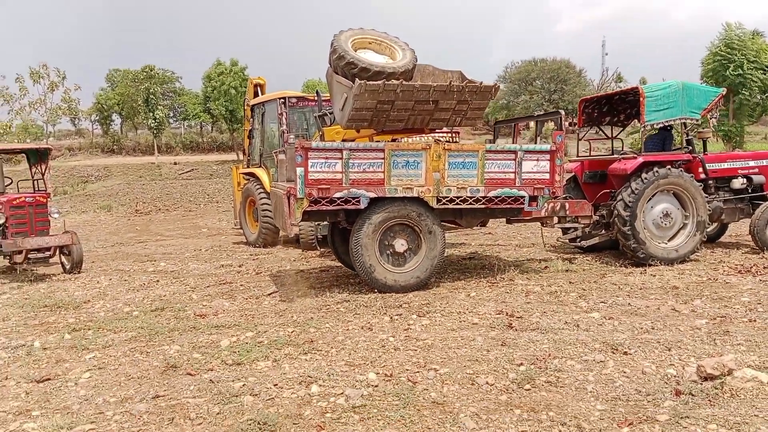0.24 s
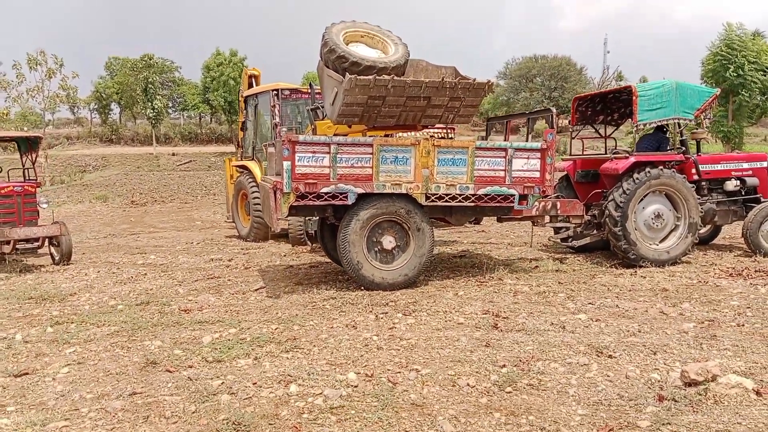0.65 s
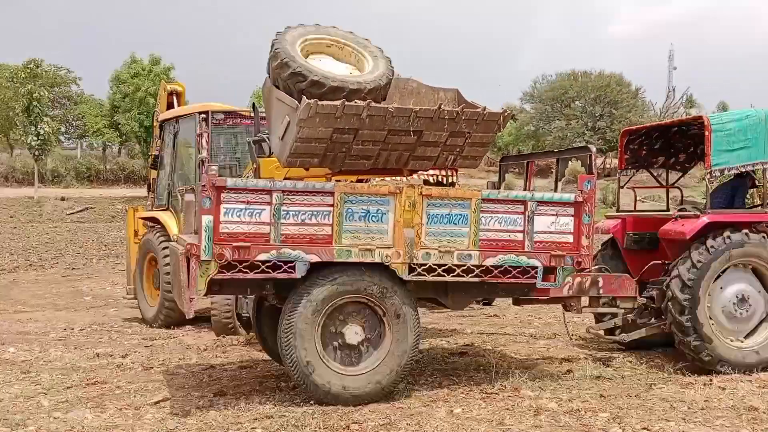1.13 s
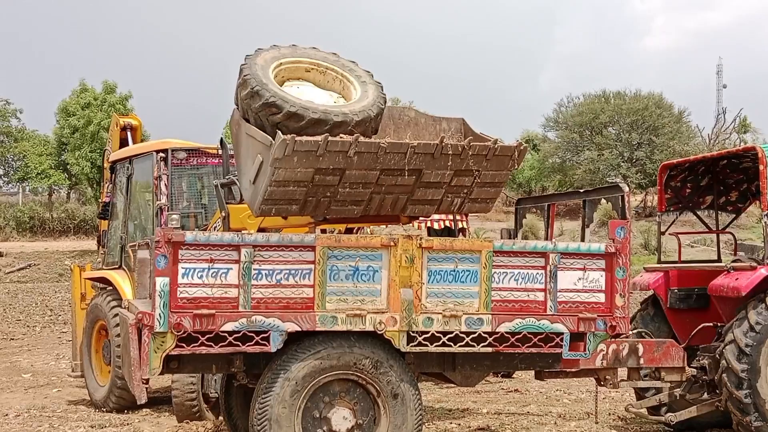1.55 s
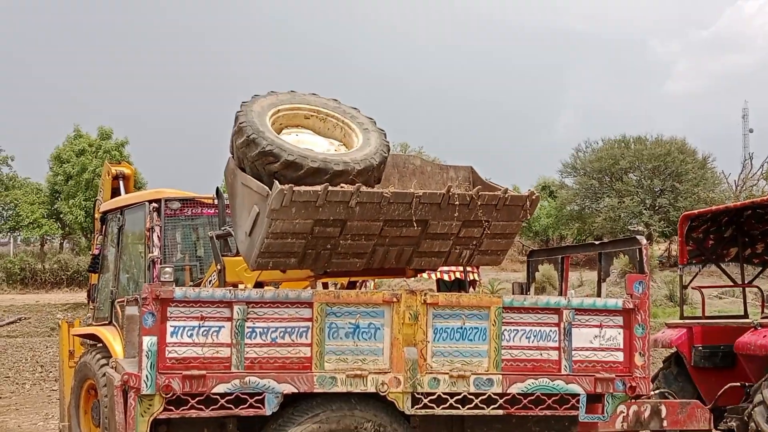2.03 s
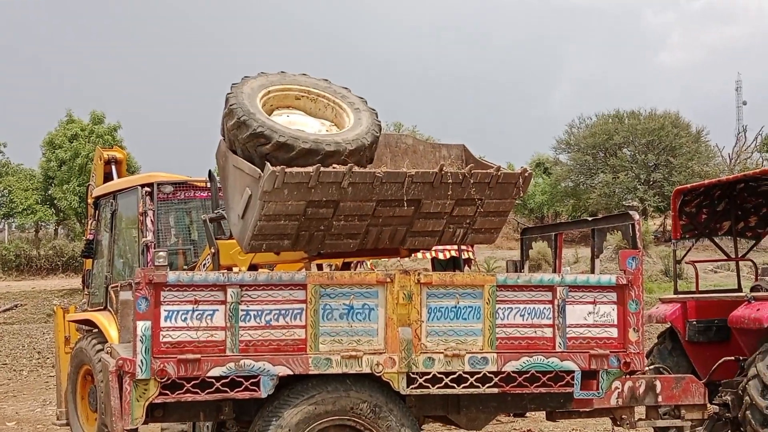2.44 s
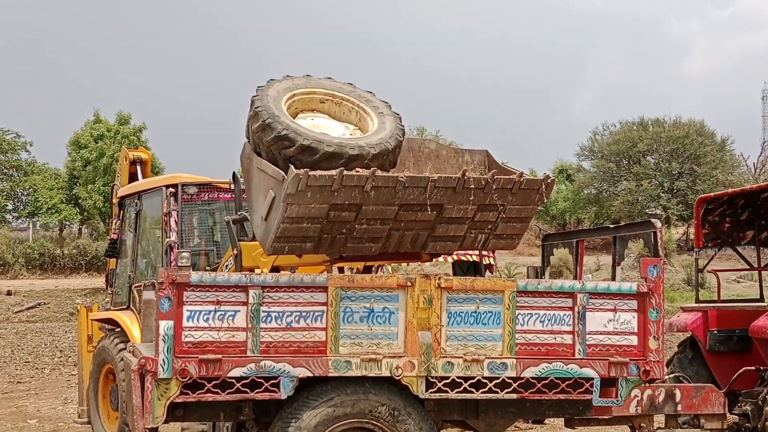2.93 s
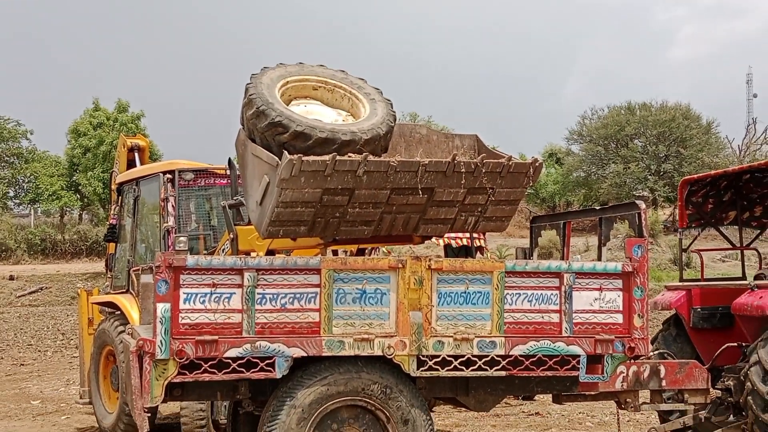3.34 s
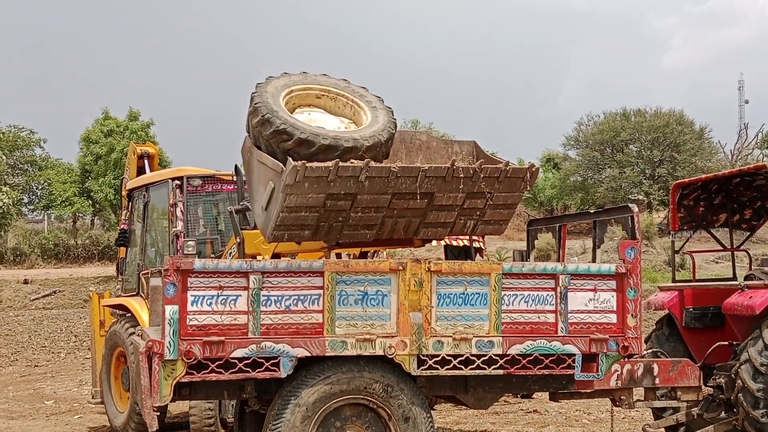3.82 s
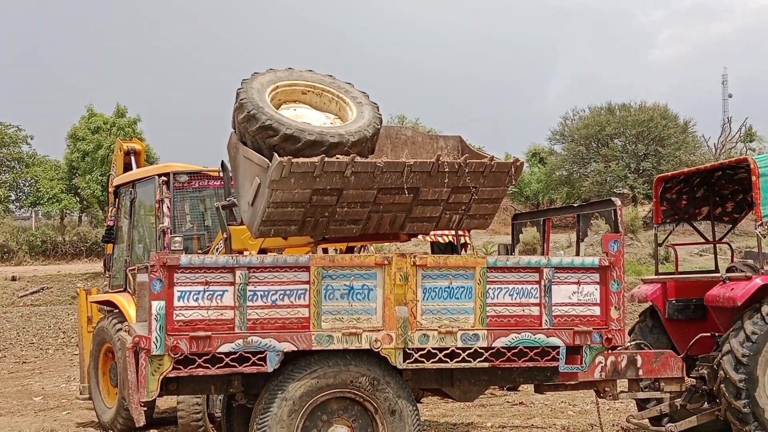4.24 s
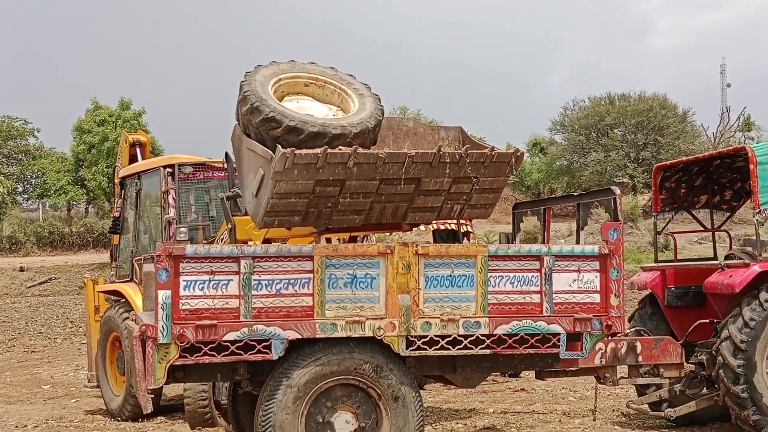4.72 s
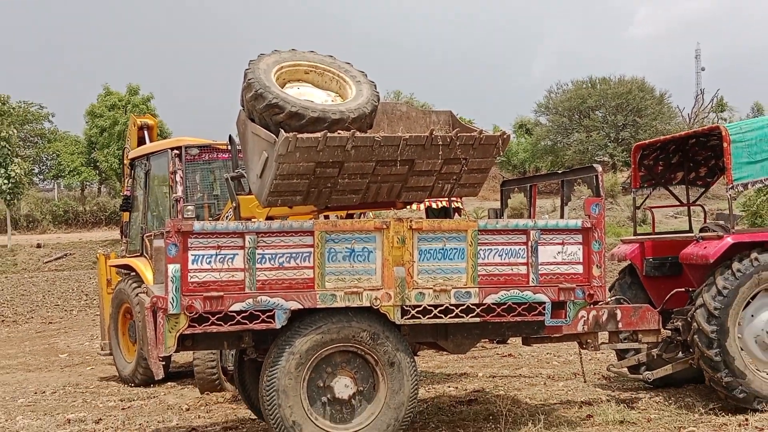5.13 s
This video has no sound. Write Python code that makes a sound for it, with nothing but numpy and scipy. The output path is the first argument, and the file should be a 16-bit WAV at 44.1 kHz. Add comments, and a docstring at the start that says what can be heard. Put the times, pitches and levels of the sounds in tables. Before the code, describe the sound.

Steady low diesel idling outdoors, with crunching dry clods, gritty scuffs, a brief squeak, scattered steel knocks and light wind bumps on the microphone.

```python
"""A diesel engine idles across a dry field: harmonics of its cycle form a deep exhaust hum, and noise
pulsed by each firing excites the panels of the block into a dull clatter, with buzzes and a far hiss.
Close by, feet scuff over grit (patchy, grainy noise) and crunch dry clods (short noise bursts);
a few knocks ring decaying steel modes, a pin ticks, a joint squeaks on a gliding tone,
and light wind rumbles on the microphone as low noise with puffs."""
import sys
import numpy as np
from scipy import signal
from scipy.fft import rfft, irfft
from scipy.io import wavfile
from scipy.ndimage import uniform_filter1d

SR = 44100
rng = np.random.default_rng(int(sys.argv[2]) if len(sys.argv) > 2 else 0)


def store_pcm(level_fs):
    """Save levels as 16-bit WAV."""
    pcm = np.round(np.clip(level_fs, -1, 1) * 32767).astype(np.int16)
    wavfile.write(sys.argv[1], SR, np.atleast_2d(pcm).T)


def elevation(decibels):
    """Turn decibel levels (scalar or array-like) into linear amplitude ratios."""
    levels = np.asarray(decibels, float)
    return 10 ** (levels / 20)


N = 237390
T = np.arange(N) / SR
TOP_ORDER = 6  # the strongest exhaust line, as a multiple of the engine cycle

# Engine speed. Each row: time in seconds, pitch of the strongest exhaust line in Hz.
ENGINE_SPEED = [(0, 92.69), (.25, 92.1), (1.5, 91.92), (1.62, 93.01), (4.9, 93.82), (5.0, 96.4),
                (5.2, 95.9), (5.3, 92.2), (5.38, 91)]
# Strongest exhaust line. Each row: time in seconds, level in dB.
HUM_LEVEL = [(0.0, -46), (0.04, -41), (0.78, -41), (0.82, -36), (1.0, -44), (1.08, -39), (1.38, -39.5),
             (1.53, -46), (1.6, -39), (1.66, -43.5), (2.13, -41.5), (2.2, -44.5), (2.31, -42),
             (2.85, -39.5), (2.91, -45), (3.15, -39), (4.08, -41), (4.22, -46), (4.3, -39), (4.38, -45.5),
             (4.6, -40), (4.76, -51), (4.92, -45), (4.97, -39.5), (5.21, -39.5), (5.26, -54), (5.33, -45.5),
             (5.38, -51)]
# Weaker exhaust lines. Each row: multiple of the engine cycle, level in dB over the strongest line,
# waver in dB (its sign only flips the random swing).
EXHAUST_LINES = [(.5, -23.5, -1.5), (1, -33, 7), (1.5, -36, 4), (2, -32, 6), (2.5, -30, 2.5), (3, -25, 3.),
                 (5, -26.5, 2), (7, -15.5, 0.5), (8, -32, 0), (9, -28, -0.5), (10, -37.5, -4.5),
                 (12, -40.5, 7.5)]
# Clatter of the block. Each row: time in seconds, level in dB.
CLATTER_LEVEL = [(0.0, -44), (0.09, -46), (0.6, -49), (0.78, -46), (0.94, -49.5), (1.03, -46), (1.3, -49),
                 (1.66, -53), (2.1, -53), (2.37, -53.5), (2.71, -55.5), (3.09, -56), (3.48, -53),
                 (3.82, -55.5), (4.18, -55.5), (4.34, -57), (4.97, -56.5), (5.14, -54), (5.38, -55)]
# Colour of the clatter. Each row: time in seconds, brightness in dB per octave above 1.2 kHz,
# treble lift in dB above 2.7 kHz.
CLATTER_TONE = [(0, 2, -6), (.8, -3.5, 0), (1.0, 12.5, -5.5), (1.6, 2, -3.5), (2.4, 10.5, -10),
                (3.1, 5.5, -3.5), (3.5, -3.5, 8), (5.38, -4.5, 11.5)]
# Spectrum of the block. Each row: frequency in Hz, relative density in dB per Hz.
BLOCK_SPECTRUM = [(120, -41), (200, -18), (267, -22.5), (508, -17.5), (651, -24.5), (881, -6),
                  (1240, -11.5), (1490, -7.5), (2120, -18), (2450, -18), (4600, -45), (5980, -88.5),
                  (10100, -120)]
# Ringing panels. Each row: frequency in Hz, width in Hz, mean level in dB over the block.
PANEL_MODES = [(360, 48, 7), (374, 6.7, 7), (891, 88, 14.5), (1089, 51, 6), (1252, 41, 7), (1428, 50, 11),
               (1672, 80, 9.5), (1767, 21, 4.5), (2600, 21, -2.5), (3477, 44, 10.5), (3900, 71, 9)]
# Buzzing panels. Each row: frequency in Hz, width of one filter pass in Hz.
BUZZ_PANELS = [(507, 26), (2440, 140)]
# Bouts of buzzing. Each row: time of the peak in seconds, panel frequency in Hz, peak level in dB,
# length in seconds.
BUZZ_BOUTS = [(0.015, 2440, -61, 0.079), (0.489, 507, -55.5, 0.063), (.57, 2440, -60.5, 0.11),
              (0.62, 507, -69, 0.032), (0.826, 2440, -52, 0.061), (0.883, 507, -65, 0.064),
              (1.151, 507, -52, 0.046), (1.2, 2440, -55.5, 0.28), (1.271, 507, -51, 0.04),
              (1.564, 2440, -64.5, 0.44), (1.594, 507, -55, .15), (2.013, 2440, -68, 0.17),
              (2.23, 507, -61.5, 0.041), (2.407, 2440, -52.5, 0.13), (2.723, 2440, -56, 0.2),
              (2.726, 507, -46.5, 0.075), (2.857, 507, -60, 0.049), (2.907, 2440, -61, 0.11),
              (3.157, 2440, -60, 0.036), (3.372, 507, -60.5, 0.051), (4.292, 2440, -67, 0.054),
              (4.642, 507, -63, 0.057), (5.12, 507, -66.5, 0.12)]
# Spectrum of the far hiss. Each row: frequency in Hz, relative density in dB per Hz.
AIR_SPECTRUM = [(2710, -41), (4600, -1), (5390, -4), (5660, -7), (6130, -11), (6560, -13.5), (7620, -6),
                (9470, -13.5), (10300, -8.5), (11600, -17), (12700, -11.5), (14900, -11.5), (16400, -21.5)]
# Loose metal shimmering in a hiss. Each row: frequency in Hz, width in Hz, nominal dB over the hiss.
SHIMMER_MODES = [(6044, 26, 12), (6670, 280, 15), (7300, 190, 7), (7800, 180, 7.5), (9000, 120, 4.5),
                 (8100, 150, 14), (10330, 350, 4), (12300, 200, 0), (12500, 850, 4.5)]
# Spectrum of the wind. Each row: frequency in Hz, relative density in dB per Hz.
WIND_SPECTRUM = [(12, -24), (28, -16.5), (45, -18.5), (110, 7), (170, 2.5), (260, -10), (450, -15.5),
                 (900, -70.5)]
# Puffs of wind. Each row: time of the peak in seconds, peak level in dB, length in seconds,
# brightness in dB per octave.
WIND_PUFFS = [(0.0, -35, 0.04, 3.5), (0.239, -36, 0.057, 0.5), (0.444, -40.5, 0.13, -7),
              (0.597, -44, 0.045, -4.5), (0.693, -48.5, .08, -8.5), (0.815, -48.5, 0.17, -11.5),
              (1.17, -46, 0.081, -12.5), (2.406, -54.5, .12, -3.5), (2.736, -53.5, 0.16, -1.5),
              (3.543, -49, 0.055, -5.5), (3.681, -44.5, .06, -3.5), (3.813, -49, 0.13, -3),
              (4.0, -46.5, 0.073, -5.5), (5.036, -56.5, 0.077, 6), (5.14, -39, 0.057, 6)]
# Chatters of the pin. Each row: start in seconds, peak in dB, change of its upper modes in dB.
PIN_TICKS = [(0.038, -51.5, -4), (0.424, -50, -6), (0.8634, -48, -16)]
# Modes of the pin. Each row: frequency in Hz, level in dB, width of one filter pass in Hz.
PIN_MODES = [(3390, -1, 59), (5160, -11, 42), (6900, -17, 90)]
# Path of the squeak. Each row: time in seconds, pitch in Hz, level in dB.
SQUEAK_PATH = [(0.12, 3650, -90), (0.152, 3620, -76), (0.22, 3680, -62.5), (0.336, 3600, -70.5),
               (0.36, 3596, -88)]
# Knocks. Each row: start in seconds, peak in dB, t60 of the blow in seconds,
# brightness in dB per octave, rise in seconds.
KNOCK_BLOWS = [(.222, -34, 0.26, -5.5, 0.0042), (.397, -43.5, 0.14, -2, .003),
               (0.779, -35, 0.45, 1.5, 0.034), (0.81, -21, 0.33, 1, 0.0041),
               (2.335, -41, 0.54, 14.5, 0.0033), (2.448, -40, 0.12, -1, 0.007),
               (2.662, -24.5, 0.27, 7.5, 0.0036), (2.711, -27, 0.4, 1, 0.012),
               (2.773, -33, 0.37, 5.5, 0.0084), (5.081, -37.5, 0.42, -1, 0.006),
               (5.095, -41.5, .2, -4, 0.0057), (5.125, -36, 0.2, -10, 0.0096),
               (5.156, -40, 0.15, -14.5, 0.0064)]
# Steel modes. Each row: frequency in Hz, mean level in dB, t60 in seconds before the blow's own fade.
STEEL_MODES = [(316.6, -7, 0.87), (594, -16.5, 0.52), (676, 1, .2), (700.6, -0.5, 0.51), (908, 6, 0.67),
               (1041, 8, 0.18), (1423, 8, 0.065), (1810, -4.5, 0.3), (2800, -11, 0.18), (2600, -5.5, 0.39),
               (3270, -6, 0.16), (4480, -19.5, 0.1), (5740, -30, 0.18), (6600, -12, 0.13), (7800, -33, .2),
               (8700, -15, .15), (10100, -33, .15)]
# Spectrum of the blow. Each row: frequency in Hz, relative density in dB per Hz.
THUD_SPECTRUM = [(88, -57), (150, -5.5), (221, 1.5), (492, -2.5), (913, 8.5), (1170, 5), (1540, 2),
                 (1720, -10), (2530, -5.5), (4760, -80.5), (6000, -43), (7800, -33), (13200, -120)]
# Dry clods snapping. Each row: start in seconds, peak of the bright part in dB, its centre in Hz,
# peak of the dull part in dB, its centre in Hz.
CLOD_SNAPS = [(0.906, -49, 8700, -64, 2400), (1.0352, -39.5, 10000, -62, 2500),
              (1.1823, -23.5, 10600, -53, 2500), (1.187, -23.5, 7300, -30, 2600),
              (1.199, -38.5, 7800, -36, 2600), (1.2215, -36.5, 9900, -40, 1900),
              (1.2444, -30.5, 7300, -45, 3760), (1.272, -39.5, 8700, -42, 1900),
              (1.2764, -34.5, 11700, -53, 2400), (1.2939, -38.5, 7960, -39, 1800),
              (1.3136, -42, 12000, -71, 1900), (1.375, -57, 10100, -55, 1900),
              (1.5257, -51, 7800, -67, 2400), (1.54, -43.5, 11400, -76, 3030),
              (1.563, -45, 14900, -72, 1900), (1.8413, -52.5, 10700, -78, 1900),
              (2.4064, -38, 12100, -44.5, 2210), (3.3803, -30.5, 10640, -74.5, 2200),
              (3.476, -33.5, 13100, -53, 3870), (3.483, -33.5, 12600, -66, 3900),
              (3.5054, -36.5, 6650, -27.5, 4220), (3.5154, -36, 11700, -46, 3750),
              (4.1425, -37.5, 8100, -67.5, 3770), (4.16, -42.5, 7750, -70.5, 1900),
              (4.1822, -44.5, 8100, -66, 1900), (4.217, -38.5, 12500, -63, 3900),
              (4.2288, -32.5, 12700, -70, 1900), (4.2338, -39.5, 12700, -70, 1900),
              (4.2495, -41, 13000, -43, 2260), (4.2647, -34.5, 10600, -29, 2100),
              (4.2669, -30, 12800, -33, 3980), (4.272, -39, 8100, -44.5, 2150),
              (5.0836, -57.5, 10300, -39, 2060), (5.1, -32, 12500, -40, 1900)]
# Softer clods crumbling. Each row: start in seconds, peak of the bright part in dB,
# peak of the dull part in dB, t60 in seconds (at most 0.08 is used).
CLOD_CRUMBLES = [(0.3434, -57, -51.5, .04), (0.8092, -39, -30.5, 0.071), (1.5763, -49, -50, .027),
                 (1.596, -45.5, -46.5, 0.24), (2.3343, -61, -48.5, 0.046), (2.3686, -53, -44, 0.12),
                 (2.66, -43, -37.5, 0.059), (2.7149, -36.5, -33, 0.093), (2.7742, -43.5, -44, .08),
                 (5.2944, -44, -74, 0.037)]
# Spectrum of the grit. Each row: frequency in Hz, relative density in dB per Hz.
GRIT_SPECTRUM = [(710, -35.5), (1200, -13), (1280, 2.5), (1510, -18.5), (2440, -10), (2850, -31.5),
                 (3140, -5), (3950, -6.5), (4860, -70), (6050, -26), (10200, -19), (15300, -36.5),
                 (16400, -51.5)]
# Soles sliding over grit. Each row: time of the peak in seconds, level in dB, rise and fall in seconds
# over 60 dB (at least 0.005 is used), brightness in dB per octave around 6 kHz.
SOLE_SCRAPES = [(.776, -64, .015, .4, -8), (0.815, -43, 0.044, 0.04, 4), (1.03, -56.5, .42, 0.44, 6.5),
                (1.165, -54, 0.84, .5, 3.5), (1.185, -45, 0.042, -0.12, -11),
                (1.275, -51.5, 0.16, -0.16, 1), (1.524, -61.5, 0.074, 0.45, 8),
                (1.603, -53.5, 0.21, 0.19, 9), (2.34, -48, 0.03, 0, -3.5), (2.407, -55, 0.015, 0.07, 14),
                (2.666, -58, 0.043, 0.65, -5), (2.714, -42.5, 0.017, 0.18, 1.5),
                (2.778, -51, .02, 0.22, -3.5), (2.83, -70, .1, .6, -6.5), (3.371, -69, 0.17, -0.8, 4),
                (3.508, -51.5, 0.034, .08, -4), (4.15, -74.5, 0.088, 0.2, 7), (4.22, -69, .04, 0.18, 8),
                (4.261, -41.5, 0.014, 0.07, -1), (5.102, -45, 0.092, -0.22, -9),
                (5.199, -58.5, 0.31, 0.55, -16.5), (5.295, -47.5, 0.021, -0.32, 30)]


def evened(x):
    """Normalisation: scales to rms 1."""
    return x / np.sqrt(np.mean(x ** 2) + 1e-20)


def read(points, hz):
    """Interpolation of a spectrum table on a log-frequency axis."""
    f, value = np.transpose(points)
    return np.interp(np.log(hz + 1), np.log(f + 1), value)


def curves(rows, t=T):
    """Linear interpolation of a table's columns over time."""
    s, *columns = np.transpose(rows)
    return [np.interp(t, s, column) for column in columns]


def add(mix, s, sound):
    """Superposition: mixes a sound in at time s."""
    part = mix[round(s * SR):][:len(sound)]
    part += sound[:len(part)]


def colour(x, shape_db, size=1024):
    """Time-varying filtering: multiplies short-time spectra by shape_db(hz, s)."""
    overlap = size * 3 // 4
    hz, s, z = signal.stft(x, SR, nperseg=size, noverlap=overlap)
    shaped = z * elevation(shape_db(hz[:, None] + 1, s))
    return signal.istft(shaped, nperseg=size, noverlap=overlap)[1][:len(x)]


def wander(hz):
    """Slow chance: low-passed noise of rms 1."""
    noise = rng.standard_normal(N + SR)
    return evened(signal.lfilter(*signal.butter(2, hz, fs=SR), noise)[SR:])  # filter settled


def blotches(hop, bins, long, wide):
    """Random patches of rms 1, smoothed over long frames and wide bins."""
    grid = rng.standard_normal((N // hop + 9, bins))
    return evened(uniform_filter1d(uniform_filter1d(grid, long, 0), wide, 1)).T


def peaks_db(modes, hz, waxing_db):
    """Power sum of resonances over a flat floor, each waxing and waning by itself."""
    power = 1
    for (centre, width, db), wax in zip(modes, waxing_db):
        power = power + elevation(2 * (db + wax)) / (1 + (2 * (hz - centre) / width) ** 2)
    return 10 * np.log10(power)


def resonate(x, hz, width):
    """A single resonance, of gain 1 at its centre."""
    return signal.lfilter(*signal.iirpeak(hz, hz / width, SR), x)


def swells(rows, t=T):
    """Bell-shaped envelopes (s, peak dB, length s), one row of gains each."""
    s, db, length = np.transpose(rows)[:, :, None]
    return elevation(db) * np.exp(-(2 * (t - s) / np.maximum(length, .01)) ** 2)


def blend(gains, values):
    """Incoherent addition: the joint gain, and the values weighted by power."""
    power = np.sum(gains ** 2, axis=0) + 1e-20
    return np.sqrt(power), np.dot(values, gains ** 2) / power


def exhaust(cycle):
    """Periodic pulsation: sine lines on multiples of the engine cycle, swelling together."""
    low_order, low_db = 4, -9.5
    lines = np.sin(2 * np.pi * TOP_ORDER * cycle)
    low_gain = elevation(low_db + 1.6 * wander(6.5))
    lines = lines + low_gain * np.sin(2 * np.pi * (low_order * cycle + rng.random()))
    for order, db, waver_db in EXHAUST_LINES:
        gain = elevation(db + waver_db * wander(18.0))
        lines = lines + gain * np.sin(2 * np.pi * (order * cycle + rng.random()))
    level_db = curves(HUM_LEVEL)[0] + .9 * wander(7.)
    return np.sqrt(2) * elevation(level_db) * lines


def firing_noise(cycle):
    """Pulsed excitation: two firings a cycle, of uneven strength, each puffing a decaying noise."""
    firing = 2 * cycle
    strengths = np.clip(1 + .4 * rng.standard_normal(int(firing[-1]) + 1), 0, 2)
    strength = strengths[firing.astype(int)]
    return (0.79 + .5 * strength * np.exp(-(firing % 1) / .35)) * rng.standard_normal(N)


def clatter(drive):
    """Forced resonance: the firing noise rings the panels of the block."""
    streaks, waxing = blotches(256, 513, 9, 2), blotches(256, len(PANEL_MODES), 11, 1)
    drift = blotches(256, 513, 16, 14)  # the resonances slide a little up and down

    def shape_db(hz, s):
        """Sum in dB of block, panels, drifting streaks and brightness."""
        n = len(s)
        tilt, top_db = curves(CLATTER_TONE, s)
        bright = tilt * np.log2(np.clip(hz / 1200, 1, 2.2)) + top_db / (1 + (2700 / hz) ** 12)
        panels = peaks_db(PANEL_MODES, hz * (1 + .03 * drift[:, :n]), 3.2 * waxing[:, :n])
        return read(BLOCK_SPECTRUM, hz) + panels + 4.2 * streaks[:, :n] + bright

    return elevation(curves(CLATTER_LEVEL)[0]) * evened(colour(drive, shape_db))


def buzz(drive):
    """Narrow-band resonance: loose panels buzz in bouts, and faintly under the clatter between them."""
    out = np.zeros(N)
    # the faint buzz is stronger when the clatter is bright
    idle_db = curves(CLATTER_LEVEL)[0] - 28 + 0.45 * curves(CLATTER_TONE)[0]
    for hz, width in BUZZ_PANELS:
        rows = [(s, db, length) for s, panel_hz, db, length in BUZZ_BOUTS if panel_hz == hz]
        gain = swells(rows).sum(axis=0) + elevation(idle_db + 5. * wander(4.6))
        out += gain * evened(resonate(resonate(drive, hz, width), hz, width))
    return out


def air(cycle):
    """Modulated noise: far hiss in thin streaks, ticking with the firing, partly following the clatter."""
    patches, waxing = blotches(128, 257, 10, 3), blotches(128, len(SHIMMER_MODES), 14, 1)
    drive = rng.standard_normal(N) * (1 + .8 * np.exp(-(2 * cycle % 1) / .15))

    def shape_db(hz, s):
        """Sum in dB of hiss, patches and shimmer."""
        n = len(s)
        shimmer = peaks_db(SHIMMER_MODES, hz, 6.8 * waxing[:, :n] - 3)
        return read(AIR_SPECTRUM, hz) + 2.2 * patches[:, :n] + shimmer

    hiss = colour(drive, shape_db, size=512)
    clatter_db = curves(CLATTER_LEVEL)[0]
    level_db = -82.5 + 0.47 * (clatter_db - clatter_db.mean()) + 3.4 * wander(2.8)
    return elevation(level_db) * evened(hiss)


def wind():
    """Turbulence noise: a lumpy low breeze with single puffs, each of its own brightness."""
    breeze_db, breeze_tilt, lumps_db = -60, 2.5, 2.5  # tilt in dB per octave above 130 Hz
    puffs, lumps = np.array(WIND_PUFFS), wander(5.0)

    def blowing(t):
        """Incoherent sum of breeze and puffs: gain and brightness at times t."""
        breeze = elevation(breeze_db + lumps_db * np.interp(t, T, lumps))
        gains = np.vstack([swells(puffs[:, :3], t), breeze])
        return blend(gains, np.append(puffs[:, 3], breeze_tilt))

    def shape_db(hz, s):
        """Spectral tilt that follows the puffs."""
        return read(WIND_SPECTRUM, hz) + blowing(s)[1] * np.log2(np.clip(hz / 130, 1, 4))

    rumble = colour(rng.standard_normal(N), shape_db, size=2048)
    coarse = T[::64]
    return np.interp(T, coarse, blowing(coarse)[0]) * evened(rumble)


def ticks():
    """Impulsive excitation of light modes: a small pin chatters three times."""
    out, t = np.zeros(N), np.arange(SR // 8) / SR
    for s, peak_db, upper_db in PIN_TICKS:
        shake = rng.standard_normal(len(t)) * elevation(-60 * t / 0.053) * np.minimum(t / 0.0011, 1)
        chatter = np.zeros(len(t))
        for k, (hz, db, width) in enumerate(PIN_MODES):
            mode = evened(resonate(resonate(shake, hz, width), hz, width))
            chatter += elevation(db + upper_db * (k > 0)) * mode
        add(out, s, elevation(peak_db) * chatter / abs(chatter).max())
    return out


def squeak():
    """Frequency modulation: a joint squeaks once on a jittering, fluttering tone with its octave."""
    out, t = np.zeros(N), np.arange(SQUEAK_PATH[0][0], SQUEAK_PATH[-1][0], 1 / SR)
    hz, db = curves(SQUEAK_PATH, t)
    phase = 2 * np.pi * np.cumsum(hz * (1 + .006 * wander(150.)[:len(t)])) / SR
    flutter = elevation(db + 4.5 * wander(40.8)[:len(t)]) * signal.windows.tukey(len(t), .2)
    add(out, t[0], np.sqrt(2) * flutter * (np.sin(phase) + 0.21 * np.sin(2 * phase)))
    return out


def ring(modes, t):
    """Free vibration: decaying modes, each struck a little differently and beating with a close twin."""
    out = np.zeros(len(t))
    for (hz, db, t60), (a, b, c) in zip(modes, rng.standard_normal((len(modes), 3))):
        tone = np.sin(2 * np.pi * hz * (1 + .006 * b) * t)
        beat = np.cos(2 * np.pi * 0.00834 * hz * c * t)
        out += elevation(db + 2.72 * a - 60 * t / t60) * tone * beat
    return out


def knocks():
    """Impact and modal response: a ragged blow of coloured noise with ringing steel modes."""
    out, t = np.zeros(N), np.arange(SR // 2) / SR
    hz = np.fft.rfftfreq(len(t), 1 / SR) + 1
    close = np.where(t > .25, signal.windows.tukey(len(t), .1), 1)  # fades the very end
    for s, peak_db, t60, tilt, rise in KNOCK_BLOWS:
        fade = elevation(-60 * t / max(t60, .03)) * np.minimum(t / max(rise, .001), 1)
        uneven = uniform_filter1d(uniform_filter1d(rng.standard_normal(len(t)), size=180), size=120)
        ragged = elevation(2.04 * evened(uneven))
        thud = evened(irfft(rfft(rng.standard_normal(len(t))) * elevation(read(THUD_SPECTRUM, hz))))
        struck = thud * fade * ragged + 0.58 * ring(STEEL_MODES, t) * np.sqrt(fade)
        bright = elevation(tilt * np.log2(np.clip(hz, 150, 4000) / 1000)) / (1 + (hz / 10500) ** 8)
        sound = irfft(rfft(struck) * bright) * close
        add(out, s, elevation(peak_db) * sound / abs(sound).max())
    return out


def clods():
    """Fracture events, louder snaps ringing longer: (s, dB, Hz, dull dB, dull Hz, t60 s)."""
    snap_t60, loud_snap_t60 = 0.0021, 0.0079  # seconds, for a snap at -45 dB and at -25 dB
    crumble_hz, dull_hz = 6900, 2600
    events = []
    for row in CLOD_SNAPS:
        loudest_db = max(row[1], row[3])
        events.append((*row, np.interp(loudest_db, [-45, -25], [snap_t60, loud_snap_t60])))
    for s, db, dull_db, t60 in CLOD_CRUMBLES:
        events.append((s, db, crumble_hz, dull_db, dull_hz, t60))
    crumbs, crumb_db = 20, -60  # small crumbs fall around randomly chosen snaps
    for a, b, c, d in rng.random((crumbs, 4)):
        s = CLOD_SNAPS[int(a * len(CLOD_SNAPS))][0] + .03 * (3 * b - 1)
        events.append((s, crumb_db + 14 * (c - .5), 7500 + 6000 * d, crumb_db - 16, dull_hz, snap_t60))
    return events


def cracks():
    """Brittle fracture: each clod gives a short burst, bright around its centre, with a duller snap below."""
    out, t = np.zeros(N), np.arange(3000) / SR
    hz = np.fft.rfftfreq(len(t), 1 / SR) + 1
    lead = 60  # samples of room ahead of the burst for the filters' pre-ringing
    for s, peak_db, centre_hz, dull_db, dull_hz, t60 in clods():
        t60 = np.clip(t60, .0015, .08)
        envelope = elevation(-60 * t / t60) * np.minimum(t / (0.047 * t60), 1)
        burst = rfft(np.roll(rng.standard_normal(len(t)) * envelope, lead))
        spray = 0.051 * (hz > 5600) * min(1, .012 / t60)  # wide treble, weaker in long bursts
        bright = irfft(burst * (spray + np.exp(-np.log2(hz / centre_hz) ** 2 / 0.12)))
        dull = irfft(burst * np.exp(-np.log2(hz / dull_hz) ** 2 / 0.091))
        crack = elevation(peak_db) * bright / abs(bright).max() + elevation(dull_db) * dull / abs(dull).max()
        add(out, s - lead / SR, crack)
    return out


def sliding(t):
    """Exponential rise and decay of the scrapes: their joint gain and brightness at times t."""
    s, db, rise, fall, tilt = np.transpose(SOLE_SCRAPES)[:, :, None]
    before, after = (s - t) / np.maximum(rise, .005), (t - s) / np.maximum(fall, .005)
    return blend(elevation(db - 60 * np.maximum(before, after)), tilt.ravel())


def scuffs():
    """Sliding friction: patchy hiss with small grains of grit, setting loose metal shimmering."""
    size, chance, noise = rng.exponential(1, N), rng.random(N), rng.standard_normal(N)
    patches, waxing = blotches(64, 129, 14, 5), blotches(64, len(SHIMMER_MODES), 24, 1)
    grains = elevation(6.4 * np.minimum(size, 4)) * (chance < 300 / SR)  # some 300 grains a second
    drive = noise * (1 + 7.9 * uniform_filter1d(grains, 24))

    def shape_db(hz, s):
        """Sum in dB of grit, brightness, patches and shimmer."""
        n = len(s)
        tilt = sliding(s)[1] * np.log2(np.clip(hz / 6000, .25, 3))
        shimmer = peaks_db(SHIMMER_MODES, hz, 5.1 * waxing[:, :n])
        return read(GRIT_SPECTRUM, hz) + tilt + 3.0 * patches[:, :n] + shimmer

    hiss = colour(drive, shape_db, size=256)
    even = hiss / np.sqrt(uniform_filter1d(hiss ** 2, 3000) + 1e-20)
    coarse = T[::16]
    return np.interp(T, coarse, sliding(coarse)[0]) * even


def scene():
    """Superposition of all sources in the open air, without reflections."""
    cycle = np.cumsum(curves(ENGINE_SPEED)[0]) / SR / TOP_ORDER
    drive = firing_noise(cycle)
    engine = exhaust(cycle) + clatter(drive) + buzz(drive) + air(cycle)
    metal = ticks() + squeak() + knocks()
    feet = cracks() + scuffs()
    return (engine + wind() + metal + feet)[None]


def low_pass(x):
    """Removes everything above the highest recorded frequency."""
    return signal.sosfilt(signal.butter(12, 16500, fs=SR, output="sos"), x)


def record(dry):
    """Linear filtering by the microphone port: a notch at 4850 Hz and a roll-off near 15.9 kHz."""
    def port_db(hz, s):
        """Sum in dB of the notch and the roll-off."""
        notch = -14 * np.exp(-((hz - 4850) / 350) ** 2)
        return notch - 20 / (1 + np.exp((15900 - hz) / 200))

    port = colour(dry[0], port_db, size=256)
    return low_pass(port[None])


dry = scene()
out = record(dry)
store_pcm(out)
```